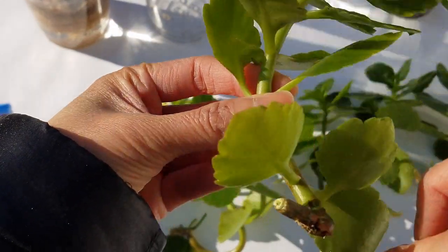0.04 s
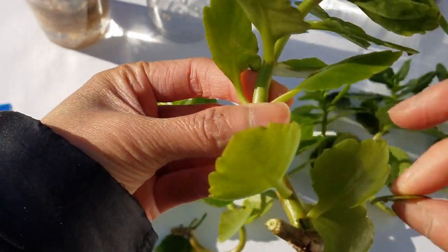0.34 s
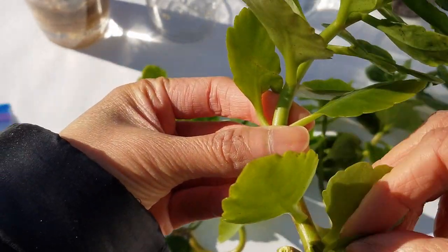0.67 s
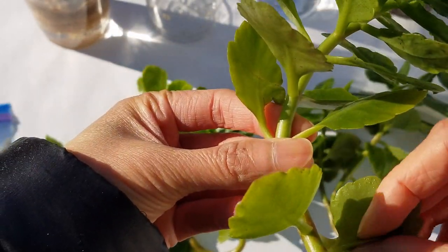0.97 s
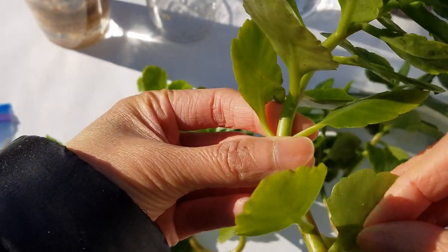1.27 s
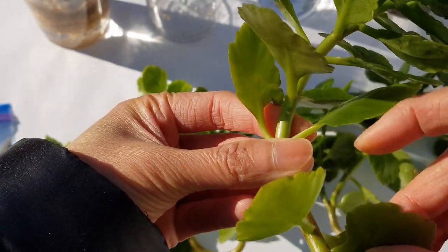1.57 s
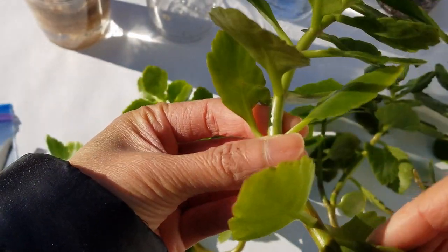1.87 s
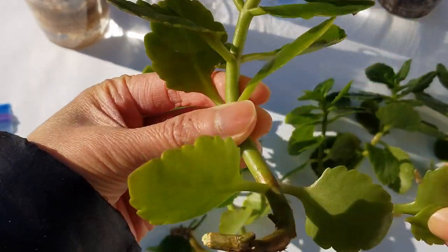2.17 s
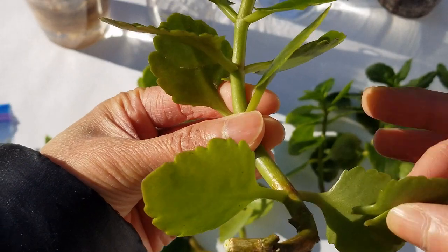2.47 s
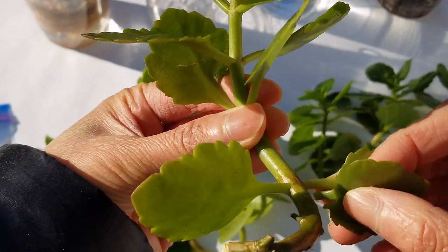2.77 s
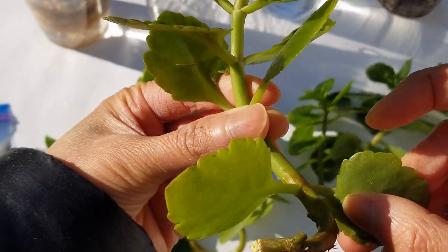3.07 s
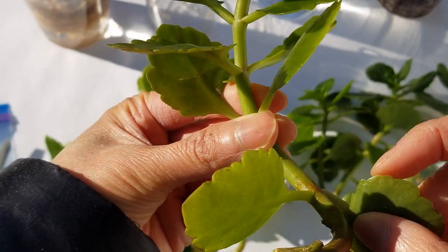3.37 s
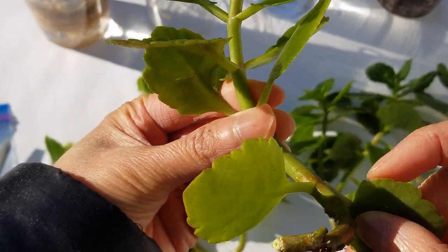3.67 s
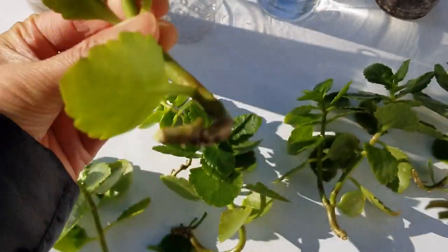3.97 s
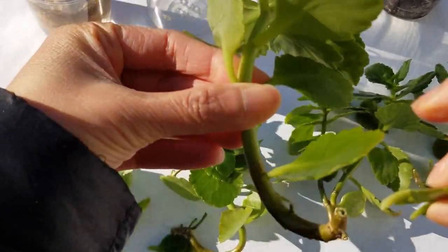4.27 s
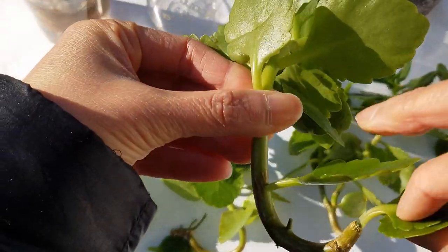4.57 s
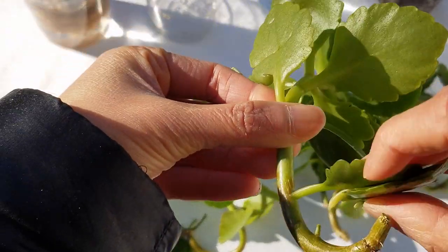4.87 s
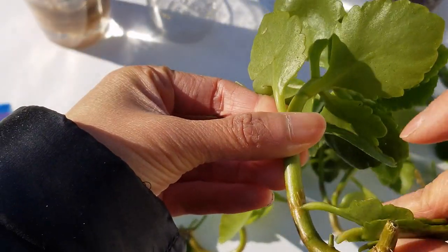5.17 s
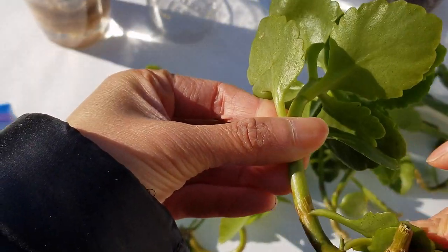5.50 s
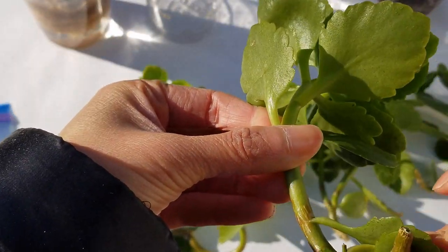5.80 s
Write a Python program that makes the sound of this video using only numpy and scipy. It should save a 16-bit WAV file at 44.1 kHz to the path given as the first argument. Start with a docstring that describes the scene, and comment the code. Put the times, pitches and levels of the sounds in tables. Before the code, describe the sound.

Close by, a hand breaks four juicy leaves from a plant stem, each with a short crack, over dull handling bumps and light ticks.

```python
"""In a small quiet room, four fleshy leaves are snapped off a stem by hand, close to the microphones.
Each stalk gives way in a few wet cracks as its cells burst, and the freed blade springs back with a thud.
Sleeves and leaves rustle as they slide and tick as they catch; a sleeve creaks at the end.
The gripping hand makes a rumble, mostly on the right, with short dull bumps on the left.
Behind it all lie a soft room tone, a hiss and a faint electrical whine."""
import sys
import numpy as np
from scipy import signal
from scipy.fft import rfft, irfft, next_fast_len
from scipy.io import wavfile
from scipy.ndimage import uniform_filter1d

SR = 44100
rng = np.random.default_rng(int(sys.argv[2]) if len(sys.argv) > 2 else 0)


def wrap_up_sound(samples):
    """Save the sound to the file named by the first command line argument, as 16-bit audio."""
    columns = np.atleast_2d(samples).T
    # keep every value between -1 and 1, then stretch to whole-number steps
    tamed = np.clip(columns, -1, 1)
    steps = np.round(tamed * 32767).astype(np.int16)
    wavfile.write(sys.argv[1], SR, steps)


N = 257544
T = np.arange(N) / SR

# Levels in the tables are relative: the functions turn each layer up or down as a whole.
# Tone of the room and the microphone hiss. Each row: frequency in Hz, level in dB.
AIR_COLOUR = [(120, 13.5), (200, 1), (219, -39), (240, 1), (293, -3), (315, 0), (446, -1.5), (677, -7),
              (957, -3.5), (1380, -9), (1540, -12), (1980, -18.5), (3300, -26), (9310, -31.5), (15500, -16)]
# Loudness of the room tone. Each row: time in seconds, level in dB.
AIR_LEVEL = [(0, -59.5), (4.2, -59.5), (5.84, -62.5)]
# How alike its two sides are. Each row: frequency in Hz, likeness from -1 (opposite) to 1 (the same).
AIR_LIKENESS = [(200, 0.9), (450, 0.69), (750, -0.078), (1200, -0.55), (2000, 0.0037), (15000, -0.062)]
# Which way it leans. Each row: frequency in Hz, left minus right in dB.
AIR_BALANCE = [(200, -14), (450, -3), (2000, -0.5), (3300, 24.5), (5200, 7.5), (9000, -1), (15000, 1.5)]
# A drifting electrical whine. Each row: time in seconds, pitch in Hz.
WHINE_PITCH = [(0, 14900), (2.3, 14650), (3.8, 14450), (5.84, 15200)]
# The room's echo. Each row: frequency in Hz, seconds to fade by 60 dB.
ECHO_FADE = [(300, 0.19), (1500, 0.21), (4000, 0.1), (15000, 0.32)]

# The grip tightens to work a leaf loose. Each row: start in seconds, length in seconds, level in dB.
GRIPS = [(.24, 0.34, -52), (.95, 0.68, -45.5), (1.96, 0.19, -30), (2.22, 0.28, -43), (2.57, 0.608, -40.5),
         (3.8, 0.11, -46), (5.19, 0.047, -49.5)]
# Tone of the rumble under a light and a firm grip. Each row: frequency in Hz, level in dB.
LIGHT_GRIP = [(25, -41), (45, 5), (64, -2), (100, -3), (150, -9), (250, -26.5), (450, -23.5), (900, -85)]
FIRM_GRIP = [(25, -4), (55, 0), (110, 3.5), (170, -7), (260, -18), (400, -22), (900, -74)]
# The rumble reaches the left too. Each row: middle in seconds, half length in seconds, level in dB.
LEFT_SPREADS = [(0.457, 0.25, -1.5), (2.008, 0.023, -2.5), (2.103, .012, -15), (2.168, 0.014, -17),
                (2.74, 0.025, -7.5), (4.332, 0.098, -6), (4.814, 0.055, 3), (5.072, 0.045, -2),
                (5.227, 0.043, -5.5)]
# The hardest shoves of the hand. Each row: middle in seconds, level in dB, pitch in Hz.
SHOVES = [(1.086, -26.5, 69), (1.117, -27.5, 65), (1.181, -27, 64), (1.27, -30.5, 66.7), (1.414, -32, 67.6),
          (1.475, -31, 65), (1.567, -38, 68), (1.844, -28, 78), (1.941, -21.5, 113), (1.988, -21.5, 68),
          (2.033, -18.5, 105), (2.104, -24.5, 111), (2.133, -23, 115), (2.17, -17.5, 60),
          (2.286, -27.5, 84.5), (2.583, -24, 81), (2.625, -28.5, 66), (2.72, -26, 85.5), (2.771, -23, 67.5),
          (2.893, -28, 62), (2.985, -24, 87), (3.043, -30, 80), (3.093, -33, 70), (3.185, -32.5, 85),
          (3.9, -33, 62), (4.241, -36.5, 70.4), (5.24, -40, 65)]
# Dull handling bumps. Each row: time in seconds, level in dB.
BUMPS = [(1.028, -34.5), (1.073, -42), (1.132, -36), (1.165, -42), (1.207, -36.5), (1.231, -39),
         (1.261, -42), (1.3, -28.5), (1.401, -45), (1.57, -38), (1.698, -44), (1.81, -37.5), (1.941, -29),
         (2.044, -28), (2.109, -30), (2.149, -24), (2.270, -27.5), (2.326, -36), (2.355, -31), (2.448, -35),
         (2.481, -30.5), (2.56, -37), (2.607, -32), (2.764, -28.5), (2.816, -32), (2.859, -27),
         (2.993, -38), (3.034, -38), (3.094, -33.5), (3.133, -36), (3.304, -36.5), (3.395, -38),
         (3.44, -42), (3.495, -31.5), (3.959, -39)]
# Skin and sleeve drag as the stem is turned. Each row: middle in seconds, half length in seconds,
# level in dB, centre frequency in Hz, left minus right in dB.
SCUFFS = [(.16, 0.054, -59, 280, 3), (.47, 0.17, -56.5, 237, 4.5), (.66, 0.022, -54, 294, 5),
          (1.946, 0.015, -32, 200, -30), (1.942, 0.021, -43.5, 388, 20), (2.03, 0.0057, -18, 137.6, 9),
          (2.041, 0.0095, -27, 222, 2), (2.078, 0.015, -43, 270, 15), (2.15, 0.049, -29, 151.7, -21),
          (2.2, 0.035, -43.5, 364, 24), (2.262, 0.02, -31.5, 138, -30), (2.262, 0.016, -42.5, 355, 20),
          (2.363, 0.02, -45, 410, 23), (2.715, 0.035, -37, 155, -13), (2.735, 0.039, -45, 354, 16),
          (2.827, 0.034, -46.5, 373, 21), (4.94, 0.014, -54, 370, 13), (5.09, .05, -55.5, 370, 6),
          (5.325, 0.012, -49, 370, 13), (5.73, 0.018, -55, 397, 9)]

# Fingers and sleeves stroke the leaves. Each row: start in seconds, length in seconds, level in dB.
STROKES = [(.07, 0.61, -74.5), (.88, 0.2, -74.5), (1.15, 0.43, -74), (1.65, 0.57, -73.5),
           (2.07, 0.39, -71.5), (2.58, 0.77, -75.5), (2.84, 0.18, -68), (3.2, 0.18, -69.5),
           (3.826, 0.085, -67), (4.07, 0.35, -71), (4.88, 0.074, -74), (5.22, 0.25, -79)]
# Tone of their rustle. Each row: frequency in Hz, level in dB.
RUSTLE_COLOUR = [(400, 0), (2000, 0), (3800, 2), (5200, .5), (7300, 1), (9500, -1), (13000, -.5),
                 (16000, -2.5)]
# A blade brushes the hand. Each row: middle in seconds, half length in seconds, level in dB, pitch in Hz.
BRUSHES = [(0.954, 0.071, -65.5, 13500), (2.117, 0.023, -62, 4000), (3.327, 0.064, -66, 13500),
           (4.95, 0.061, -65.5, 13800), (5.34, 0.016, -64.5, 11200), (5.825, .025, -59, 12500)]
# Faint squeaks. Each row: start in seconds, length in seconds, first and last pitch in Hz, level in dB.
SQUEAKS = [(2.069, 0.012, 874, 820, -37.5), (2.28, 0.047, 2850, 2390, -54), (5.662, 0.05, 2850, 2280, -54)]
# Fingers rub a leaf. Each row: middle in seconds, half length in seconds, level in dB.
RUBS = [(1.235, 0.011, -56), (2.185, 0.0095, -52), (2.882, 0.092, -62.5), (3.058, 0.0099, -50),
        (3.098, 0.015, -52.5), (3.419, 0.0072, -50.5), (3.495, 0.014, -58.5), (4.129, 0.03, -58),
        (4.202, 0.0033, -46.5)]
# How a rubbed leaf rings. Each row: frequency in Hz, width in Hz, level in dB.
RUB_RING = [(570, 270, 6), (870, 530, 4), (1500, 550, -1.5)]
# Dry ticks of cloth and leaf edges. Each row: start in seconds, level in dB, ring pitch in Hz.
TICKS = [(0.076, -34, 13400), (0.3132, -45, 12000), (0.491, -44, 14900), (2.308, -42, 14000),
         (2.768, -53, 8300), (2.792, -44, 8200), (2.912, -45, 8500), (2.9245, -48, 12500),
         (2.9285, -40, 7200), (2.933, -44, 12000), (3.024, -46, 13500), (3.192, -46, 13000),
         (3.8278, -32.5, 14500), (3.829, -36, 13500), (3.913, -40, 13100), (4.276, -49, 12000),
         (4.715, -46, 8160), (5.1143, -46, 13800), (5.1907, -45, 15100), (5.3265, -54, 11500),
         (5.3735, -48, 8500), (5.7365, -49, 14500), (5.745, -42, 14000)]
# The ring all ticks share. Each row: frequency in Hz, width in Hz, level in dB.
TICK_RING = [(7650, 1700, -1.5), (11500, 4800, 4), (14500, 5500, 9.5)]

# Leaf and stem spring back. Each row: start in seconds, level in dB, pitch in Hz, rise time in seconds.
THUDS = [(1.597, -40, 565, 0.00042), (1.6058, -40.5, 554, .0002), (2.4065, -36.5, 554, 0.00028),
         (2.4142, -36.5, 520, 0.00018), (3.2055, -31, 535, 0.0012), (3.226, -42.5, 510, .0002),
         (4.2845, -29.5, 553, 0.0022), (4.3085, -31.5, 555, 0.000091), (4.3219, -37, 549, .0005)]
# The tones they ring with. Each row: multiple of the pitch, level in dB, seconds to fade by 60 dB.
LEAF_TONES = [(.45, -13, .04), (1, 0, .075), (1.55, -11, .035), (2.19, -14, .045)]
# How a breaking stalk rings. Each row: frequency in Hz, width in Hz, level in dB.
STALK_RING = [(810, 440, 3.5), (1230, 180, 7), (1710, 1200, -2), (2940, 920, -7.5), (3700, 430, -10),
              (6000, 1160, -5), (7830, 1100, -6.5), (11500, 2000, -9), (14000, 2500, -9)]
# Each stalk tears, cracks through and loses its last fibres. Each row: start in seconds, level in dB,
# treble limit in Hz, ring pitch in Hz, ring level in dB, fade time in seconds.
CRACKS = [(1.5795, -36, 15000, 4040, 5, .0009), (1.583, -25, 15000, 5150, 2.5, 0.00086),
          (1.5873, -30.5, 11000, 4000, 6, 0.0008), (2.39, -36, 16000, 14000, 0, 0.0011),
          (2.392, -32.5, 5500, 3900, -3, .0016), (2.3968, -24.5, 6000, 3970, 1, 0.00077),
          (2.4254, -38, 12000, 3520, 2, .0008), (3.083, -37.5, 5900, 4230, 6.5, 0.0012),
          (3.199, -41, 4000, 4200, -1, .004), (3.2214, -32, 4000, 3950, 3, 0.00085),
          (3.2227, -25.5, 2300, 1860, 15, .0011), (3.2308, -33.5, 2200, 1940, 12, 0.0021),
          (4.2814, -35.5, 4500, 3470, 2, 0.003), (4.2992, -23, 15500, 3700, 2, .0011),
          (4.3001, -29, 12000, 7350, 0, 0.0012), (4.3043, -34.5, 15000, 3800, 5, .002),
          (4.3088, -29, 1150, 1190, 2, 0.0013), (4.32, -42, 7000, 3700, 0, .0015)]


def from_db(db):
    """Turn decibels into a number to multiply by."""
    return 10 ** (np.asarray(db) / 20)


def rms_one(x):
    """Scale a sound so that its average power is 1."""
    return x / np.sqrt(np.mean(x ** 2) + 1e-20)


def at_hz(points, hz):
    """Read between the rows of a table, with every octave equally wide."""
    points = np.array(points)
    return np.interp(np.log(np.maximum(hz, 1)), np.log(points[:, 0]), points[:, 1])


def cut(x, hz, kind, order=2):
    """Filter a sound, keeping its "low" part, its "high" part or a "band"."""
    sections = signal.butter(order, np.clip(hz, 10, .45 * SR), kind, fs=SR, output="sos")
    return signal.sosfilt(sections, x + 1e-18)


def resonate(x, rings):
    """Make a sound ring at several frequencies, with every second ring flipped in sign."""
    out = 0
    for k, (hz, width, db) in enumerate(rings):
        r = np.exp(-np.pi * width / SR)
        ring = signal.lfilter([1, 0, -1], [1, -2 * r * np.cos(2 * np.pi * hz / SR), r * r], x + 1e-18)
        out = out + (-1) ** k * from_db(db) * (1 - r * r) / 2 * ring
    return out


def noise(colour):
    """Noise whose tone follows rows of frequency and level."""
    size = next_fast_len(N)
    hz = np.arange(size // 2 + 1) * SR / size
    spectrum = rfft(rng.standard_normal(size)) * from_db(at_hz(colour, hz))
    return rms_one(irfft(spectrum, size)[:N])


def wander(hz):
    """A slow random wobble, mostly below the given rate."""
    return noise([(hz, 0), (4 * hz, -40), (20 * hz, -120)])


def jerks(samples, per_s):
    """Tiny clicks of random size at random times."""
    return rng.standard_normal(samples) * (rng.random(samples) < per_s / SR)


def even(x, span_s):
    """Hold the short-time level of a noise at 1."""
    return x / np.sqrt(uniform_filter1d(x * x, max(int(span_s * SR), 2)) + 1e-6)


def hump(t, half_s):
    """A smooth rise and fall that peaks where t is zero."""
    return np.exp(-np.square(t / half_s))


def swells(rows, rest_db, attack_s, release_s):
    """Level in dB of movements that set in, hold and die away over a resting level."""
    power = from_db(rest_db) ** 2
    for s, length_s, db in rows:
        shape = np.clip((T - s) / attack_s, 0, 1) * np.exp(-np.maximum(T - s - length_s, 0) / release_s)
        power = power + (from_db(db) * shape) ** 2
    return 10 * np.log10(power)


def burst(length_s, after_db=1):
    """One sharp snap, then a quick run of tiny ones that dies away."""
    t = T[:SR // 25]
    after = even(rng.standard_normal(len(t)), span_s=.0005) * np.exp(-t / length_s)
    sound = (t == 0) + from_db(after_db) * np.sqrt(length_s / .001) * after / np.linalg.norm(after)
    return sound / np.linalg.norm(sound)


def add(track, s, sound):
    """Mix a sound into a track, starting at s seconds."""
    start = int(np.clip(round(s * SR), 0, N - 1))
    track[start:start + len(sound)] += sound[:N - start]


def place(x, lead_s, pan_db):
    """Two spaced microphones: the left one hears earlier by lead_s and louder by pan_db."""
    return np.array([x * from_db(pan_db / 2), np.interp(T - lead_s, T, x) * from_db(-pan_db / 2)])


def room(x, gap_s=0.004):
    """The walls return a short blur of echoes; each frequency band fades at its own speed."""
    t, tail = T[:SR // 2], 0
    edges = np.geomspace(200, 16000, 8)
    for low, high in zip(edges, edges[1:]):
        band = cut(rng.standard_normal((2, len(t))), [low, high], "band")
        tail = tail + band * from_db(-60 * t / at_hz(ECHO_FADE, np.sqrt(low * high)))
    tail = rms_one(tail * np.clip(t / gap_s - .5, 0, 1)) / np.sqrt(len(t))
    return signal.fftconvolve(x[None], tail, axes=1)[:, :N]


def air(level_db=1.58, low_hz=220):
    """Room tone, alike on both sides in the lows, under the microphones' own hiss."""
    hz = np.arange(N // 2 + 1) * SR / N
    alike = np.clip(at_hz(AIR_LIKENESS, hz), -1, 1)
    sides = np.array([[1], [-1]])
    shared = np.sqrt(1 + alike) * rfft(noise(AIR_COLOUR))
    opposed = sides * np.sqrt(1 - alike) * rfft(noise(AIR_COLOUR))
    both = irfft((shared + opposed) * from_db(sides * at_hz(AIR_BALANCE, hz) / 2), N)
    gain = from_db(np.interp(T, *np.transpose(AIR_LEVEL)) + level_db)
    return gain * rms_one(cut(both, low_hz, "high", order=4))


def whine(level_db=-81):
    """A thin electrical tone that drifts in pitch."""
    hz = np.interp(T, *np.transpose(WHINE_PITCH))
    return from_db(level_db) * np.sin(2 * np.pi * np.cumsum(hz) / SR)


def nudges(grip_db, count=130, gap_s=.075, pitch_hz=70.8, above_db=3.5, top_db=-38.5, spread_db=3.5):
    """The fingers shift at uneven times, harder when the grip is firm; gives rows like SHOVES."""
    gap, size, pitch = rng.standard_normal((count, 3)).T
    s = np.cumsum(gap_s * np.exp(.45 * gap))
    db = np.minimum(np.interp(s, T, grip_db) + above_db, top_db) + spread_db * size
    return [row for row in zip(s, db, pitch_hz * np.exp(.12 * pitch)) if row[0] < T[-1]]


def thumps(shoves, level_db=-1, cycles=0.99, grit_db=-13, sag_db=-12):
    """Each shove is a couple of slow swings over a slower sag; slipping skin adds grit above them."""
    out, t = np.zeros(N), T[:SR // 8] - 1 / 16
    for s, db, hz in shoves:
        sway = np.sin(2 * np.pi * (hz * t + rng.random()))
        sag = from_db(sag_db) * np.sin(np.pi * hz * t) * rng.choice([-1, 1])
        slip = cut(rng.standard_normal(len(t)), [1.4 * hz, 2.41 * hz], "band", order=3)
        grit = from_db(grit_db) * np.square(hz / 100) * even(slip, span_s=.015)
        add(out, s + t[0], from_db(db + level_db) * hump(t, cycles / hz) * (sway + sag + grit))
    return out


def rumble(grip_db, shoves, firm_from_db=-42, firm_range_db=11, flutter_db=-9, flutter_top_db=-47,
           uneven_db=3.0, left_db=-1):
    """A firmer grip gives a louder, fuller rumble; the left mostly hears only its fluttering top."""
    firmness = np.clip((grip_db - firm_from_db) / firm_range_db, 0, 1)
    light, firm = np.sqrt(1 - firmness), np.sqrt(firmness)
    rumbles = []
    for _ in range(2):
        pushes = thumps(shoves)
        hold = even(light * noise(LIGHT_GRIP) + firm * noise(FIRM_GRIP), span_s=0.047)
        rumbles.append(pushes + from_db(grip_db) * hold)
    right, other = rumbles
    spread = sum(from_db(db) * np.exp(-((T - s) / half_s) ** 4) for s, half_s, db in LEFT_SPREADS)
    flutter = cut(cut(rng.standard_normal(N), 292, "high", order=6), 416, "low", order=3)
    flutter_gain = from_db(np.minimum(grip_db, flutter_top_db) + flutter_db + uneven_db * wander(11.8))
    left = from_db(left_db) * spread * (light * right + firm * other) + flutter_gain * rms_one(flutter)
    return np.array([left, right])


def scuffs(slips_per_s=400, band_ratio=1.29):
    """Skin and sleeve drag in a close run of soft slips, heard as a dull, rolling rub."""
    out, t = np.zeros((2, N)), T[:SR // 2] - 1 / 4
    for s, half_s, db, hz, pan_db in SCUFFS:
        slips = cut(jerks(len(t), slips_per_s), [hz / band_ratio, hz * band_ratio], "band", order=3)
        rub = from_db(db) * hump(t, half_s) * even(rms_one(slips), span_s=0.0242)
        sides = from_db([pan_db / 2, -pan_db / 2])
        for track, gain in zip(out, sides / sides.max()):
            add(track, s + t[0], gain * rub)
    return out


def bumps(level_db=-4.5, low_hz=270, high_hz=480):
    """Soft, short handling knocks on the left, with the bass taken out."""
    click = 1. * (T[:SR // 20] == 0)
    knock = cut(cut(click, low_hz, "high", order=6), high_hz, "low", order=4)
    out, crest = np.zeros((2, N)), np.argmax(abs(knock))
    for s, db in BUMPS:
        add(out[0], s - crest / SR, from_db(db + level_db) * knock / knock[crest] * rng.choice([-1, 1]))
    return out


def handling():
    """The grip drives the rumble and the nudges; scuffs and bumps ride on top."""
    grip_db = swells(GRIPS, rest_db=-53.5, attack_s=0.013, release_s=0.069)
    return rumble(grip_db, SHOVES + nudges(grip_db)) + scuffs() + bumps()


def rustle(wide_db=4.5, near_db=-2, catches_per_s=220, size_db=10.0, grain_low_hz=4500):
    """Sliding over the leaves gives a soft hiss with small catches scattered through it."""
    sizes = from_db(size_db * np.minimum(rng.exponential(1, N), 3)) * rng.choice([-1, 1], N)
    catches = sizes * (rng.random(N) < catches_per_s / SR)
    grains = rms_one(cut(signal.fftconvolve(catches, burst(0.0024))[:N], grain_low_hz, "high"))
    near = from_db(near_db) * cut(noise(RUSTLE_COLOUR), 7700, "high") + grains
    wide = from_db(wide_db) * np.array([noise(RUSTLE_COLOUR), noise(RUSTLE_COLOUR)])
    gain = from_db(swells(STROKES, rest_db=-82.0, attack_s=0.016, release_s=0.091))
    return gain * (place(near, lead_s=-0.000411, pan_db=-4.0) + wide)


def brushes(width_share=0.15):
    """Each blade hisses around a pitch of its own as it slides past the hand."""
    out = 0
    for s, half_s, db, hz in BRUSHES:
        hiss = resonate(rng.standard_normal((2, N)), [(hz, width_share * hz, 0)])
        out = out + from_db(db) * hump(T - s, half_s) * rms_one(hiss)
    return out


def squeaks(level_db=-1, waver=0.033, room_db=-6):
    """Short, thin falling tones with a rough pitch, a little blurred by the room."""
    out = np.zeros(N)
    for s, length_s, start_hz, end_hz, db in SQUEAKS:
        glide = np.linspace(start_hz, end_hz, int(length_s * SR))
        wobble = rms_one(cut(rng.standard_normal(SR // 4), 250, "low"))[:len(glide)]
        tone = np.sin(2 * np.pi * np.cumsum(glide * (1 + waver * wobble)) / SR)
        add(out, s, from_db(db + level_db) * np.hanning(len(tone)) * tone)
    return .5 * (place(out, lead_s=.0001, pan_db=1.0) + from_db(room_db) * room(out))


def rubs(level_db=-2, slips_per_s=900):
    """Skin slips over the waxy blade in many small jerks."""
    stroke = sum(from_db(db + level_db) * hump(T - s, half_s) for s, half_s, db in RUBS)
    return stroke * even(resonate(jerks(N, slips_per_s), RUB_RING), span_s=0.018)


def creak(count=10, start_s=5.7735, first_gap_s=.0117, last_gap_s=.0052, peak_db=-38.5, swell_db=4):
    """A sleeve sticks and slips, quickening to a buzz, loudest midway; gives rows like TICKS."""
    k = np.arange(count)
    gaps = last_gap_s + (first_gap_s - last_gap_s) * .55 ** k
    db = peak_db - swell_db * np.square(2 * k / count - 1)
    ring_hz = rng.uniform(10600, 14500, count)
    return list(zip(start_s + np.cumsum(gaps) - gaps, db, ring_hz))


def stray_ticks(count=20, db=-54, spread_db=2):
    """Leaf edges touch faintly at random times; gives rows like TICKS."""
    return [(rng.uniform(0, T[-1]), rng.normal(db, spread_db), rng.uniform(7000, 15000))
            for _ in range(count)]


def ticks(level_db=2, length_s=0.00074, ring_width_hz=2600, ring_db=3, low_edge_share=0.42):
    """Taut cloth and leaf edges catch and let go; the higher the ring, the thinner the tick."""
    out = np.zeros(N)
    for s, db, ring_hz in TICKS + creak() + stray_ticks():
        slip = burst(length_s)
        ring = resonate(slip, TICK_RING) + resonate(slip, [(ring_hz, ring_width_hz, ring_db)])
        sound = cut(ring, low_edge_share * ring_hz, "high")
        add(out, s, from_db(db + level_db) * sound / np.max(abs(sound)))
    return out


def thuds(caught_s=0.0047, still_ringing_db=-3.5, flap_db=-15.0, flap_s=0.0099):
    """The blade springs free with a noisy flap; the fingers catch it at once and soften its ring."""
    out, t = np.zeros(N), T[:SR // 4]
    for s, db, hz, rise_s in THUDS:
        ring = 0
        for ratio, tone_db, fade_s in LEAF_TONES:
            fade = from_db(tone_db + rng.normal(0, 1.5) - 60 * t / fade_s)
            ring = ring + fade * np.sin(2 * np.pi * hz * ratio * t)
        damping = np.maximum(np.exp(-t / caught_s), from_db(still_ringing_db))
        flap_noise = rms_one(cut(rng.standard_normal(len(t)), [400, 1400], "band"))
        flap = from_db(flap_db) * np.exp(-t / flap_s) * flap_noise
        add(out, s, from_db(db) * (ring * damping + flap) * (1 - np.exp(-t / rise_s)))
    return out


def splinters(level_db=-9, per_s=700, decay_s=0.0032):
    """Single fibres part just after a crack, ever more faintly."""
    t = T[:SR // 25]
    fibres = jerks(len(t), per_s) * np.exp(-t / decay_s)
    return from_db(level_db) * fibres / (np.linalg.norm(fibres) + 1e-9)


def cracks(level_db=5, width_share=0.15):
    """Juicy cells burst in bundles, each with its own ring and splinters; thick, wet ones sound duller."""
    out = np.zeros(N)
    for s, db, treble_hz, ring_hz, ring_db, length_s in CRACKS:
        stalk = resonate(burst(length_s) + splinters(), STALK_RING)
        snap = burst(length_s) * rng.choice([-1, 1])
        bundle = resonate(snap, [(ring_hz, width_share * ring_hz, ring_db)])
        # the bundle lets go a moment after the first break
        sound = cut(stalk + np.roll(bundle, SR // 2500), treble_hz, "low")
        # at the same level, a longer crack carries more energy
        strength = np.sqrt(np.sum(sound ** 2) / (length_s * SR))
        add(out, s, from_db(db + level_db) * sound / strength / 4)
    return out


def scene(crack_room_db=-6, leaf_room_db=-5, tick_room_db=-11, wall_hz=14000):
    """Mix all the layers: the stalks crack a little to the left, the sleeve ticks to the right."""
    crack, leaf, tick = cracks(), thuds() + rubs(), ticks()
    direct = (place(crack, lead_s=0.000276, pan_db=4.0)
              + place(leaf, lead_s=.0001, pan_db=-1.5)
              + place(tick, lead_s=-0.000272, pan_db=-3.0))
    echo = room(from_db(crack_room_db) * cut(crack, wall_hz, "low", order=1)
                + from_db(leaf_room_db) * leaf + from_db(tick_room_db) * tick)
    return direct + echo + rustle() + brushes() + squeaks() + handling() + air() + whine()


def record(dry):
    """Cut away the deepest bass and the very highest treble."""
    low_hz, high_hz = 22, 15750
    steep_cut = signal.ellip(12, .1, 80, high_hz, fs=SR, output="sos")
    return signal.sosfilt(steep_cut, cut(dry, low_hz, "high"))


dry = scene()
out = record(dry)
wrap_up_sound(out)
```